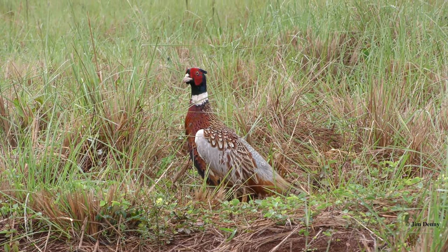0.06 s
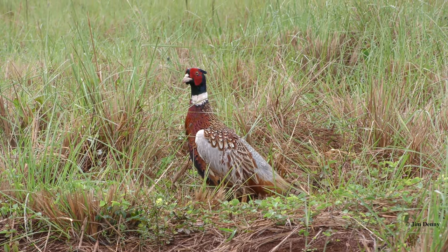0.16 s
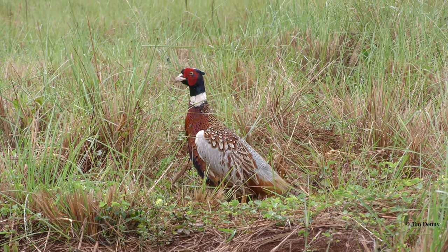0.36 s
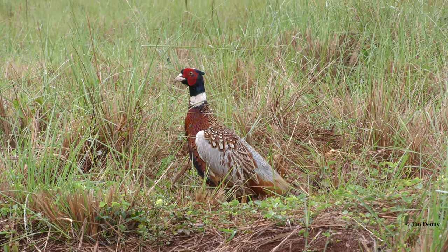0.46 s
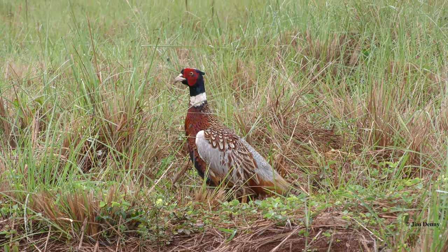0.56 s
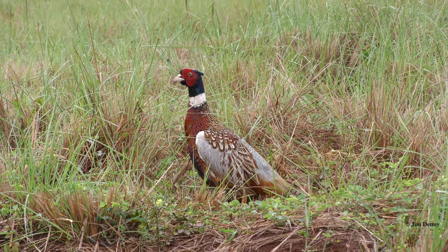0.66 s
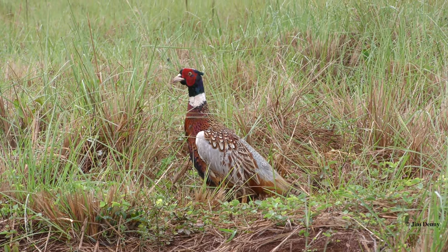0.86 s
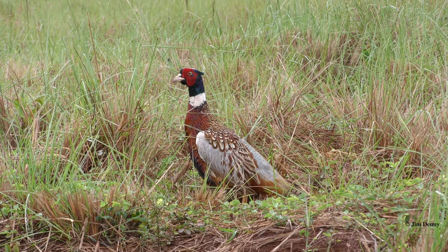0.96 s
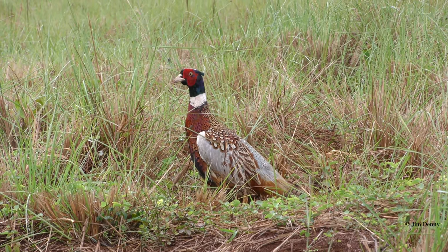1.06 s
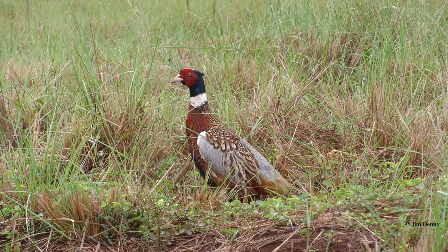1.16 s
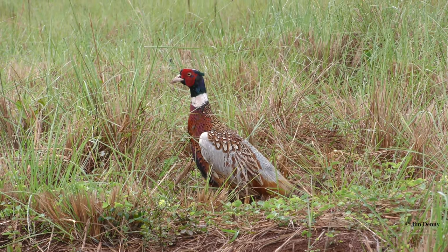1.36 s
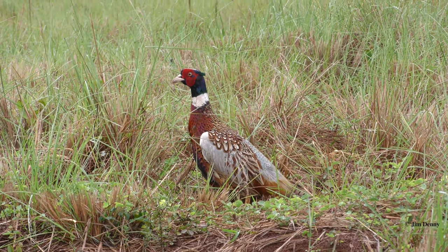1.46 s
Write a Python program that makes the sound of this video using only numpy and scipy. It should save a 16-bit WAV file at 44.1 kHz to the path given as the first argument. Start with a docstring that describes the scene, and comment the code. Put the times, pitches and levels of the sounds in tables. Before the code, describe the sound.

A pheasant crows harshly twice, then flaps its wings briefly in an open field.

```python
"""Over a low wash of air and a faint chirp, a cock pheasant crows twice in an open grass field.
A short whirr of wingbeats follows, while small birds whistle far off.
Each note of the crow is a shaky tone plus a harsh rattle, filtered by the resonances of the throat;
the grass scatters it and the field echoes it. Each wingbeat pushes a pulse of air and swishes."""
import sys
import numpy as np
from scipy import signal
from scipy.fft import rfft, irfft
from scipy.io import wavfile
from scipy.ndimage import uniform_filter1d

SR = 44100
rng = np.random.default_rng(int(sys.argv[2]) if len(sys.argv) > 2 else 0)


def dump_mix(stems):
    """Bounce the given channels to the path in sys.argv[1] as a 16-bit WAV at rate SR."""
    frames = np.atleast_2d(stems).T  # one column per channel
    limited = np.clip(frames, -1, 1)  # hard clip at full scale
    pcm = np.round(limited * 32767).astype(np.int16)
    wavfile.write(sys.argv[1], SR, pcm)


N = 66150
T = np.arange(N) / SR


def amp(db):
    """Amplitude ratio of a level in decibels."""
    return 10 ** (np.asarray(db) / 20)


def unit(x):
    """Normalisation to an rms of 1."""
    return x / np.sqrt(np.mean(abs(x) ** 2) + 1e-20)


def read(points, hz):
    """Interpolation of a table on a log-frequency axis."""
    f, value = np.transpose(points)
    return np.interp(np.log(hz + 1), np.log(f + 1), value)


def pulse(t, width_s):
    """Gaussian envelope centred on t = 0."""
    return np.exp(-.5 * (t / width_s) ** 2)


def wander(hz):
    """Low-pass noise: smooth random motion up to a given rate."""
    f = np.fft.rfftfreq(N, 1 / SR)
    return unit(irfft(rfft(rng.standard_normal(N)) / (1 + (f / hz) ** 4), N))


def colour(x, points, size=4096):
    """Minimum-phase filtering with the given spectrum."""
    log_gain = np.log(amp(read(points, abs(np.fft.fftfreq(size, 1 / SR)))))
    taps = np.fft.ifft(np.exp(np.conj(signal.hilbert(log_gain)))).real[:size // 2]
    return signal.fftconvolve(x, taps)[:N]


def scatter(x, levels, t60s, size=256):
    """Reverberation: many small reflections, different at each ear, decay exponentially in each band."""
    hz, t, bands = signal.stft(rng.standard_normal((2, SR)), SR, nperseg=size)
    fade = amp(-60 * t / read(t60s, hz)[:, None]) * (t > 0)
    fade *= amp(read(levels, hz))[:, None] / np.sqrt((fade ** 2).sum(1, keepdims=True) * size / 2)
    response = signal.istft(bands * fade, SR, nperseg=size)[1]
    return signal.fftconvolve(x[None], response, axes=1)[:, :N]


# Likeness of the two channels. Each row: frequency in Hz, left-right correlation.
COHERENCE = [(60, .99), (290, 0.95), (640, 0.8), (1410, 0.45), (3100, -0.16), (6800, 0.027), (15000, 0.063)]
def diffuse_noise(points, patch_db, size=1024):
    """A diffuse field: both ears agree at low frequencies, and the level drifts in random patches."""
    hz = np.fft.rfftfreq(size, 1 / SR)
    a, b, c, d, patch = rng.standard_normal((N // 256 + 5, len(hz), 5)).T
    patch = unit(uniform_filter1d(uniform_filter1d(patch, size=10, axis=0), size=10, axis=1))
    same = np.clip(read(COHERENCE, hz), -1, 1)[:, None]
    left = a + 1j * b
    right = same * left + np.sqrt(1 - same ** 2) * (c + 1j * d)
    bands = np.array([left, right]) * amp(read(points, hz)[:, None] + patch_db * patch)
    return unit(signal.istft(bands, nperseg=size, noverlap=size - size // 4)[1][:, :N])


# Spectrum of the air. Each row: frequency in Hz, relative level in dB.
AIR_SPECTRUM = [(20, -17), (60, -2), (250, 0), (600, 4.5), (950, 2.5), (1400, -5.5), (2200, -27),
                (4500, -19.5), (8000, -20), (15500, -27.5)]
def air():
    """Ambient noise: a low, steady wash from all directions."""
    return amp(-45.5) * diffuse_noise(AIR_SPECTRUM, patch_db=-1.5)


# Distant chirps. Each row: start and length in seconds, first and last pitch in Hz, level in dB.
CHIRPS = [(.165, 0.062, 5080, 4750, -52.5), (1.112, 0.055, 3330, 3150, -44), (1.18, 0.036, 3300, 2740, -47),
          (1.318, 0.068, 4430, 4010, -44.5), (1.398, 0.017, 4110, 3530, -44.5),
          (1.412, 0.062, 3480, 3576, -49)]
def small_birds():
    """Frequency glides: thin, wavering whistles, blurred by reverberation over the distance."""
    song = np.zeros(N)
    for start, length, first_hz, last_hz, db in CHIRPS:
        progress = np.clip((T - start) / length, 0, 1)
        hz = (first_hz + (last_hz - first_hz) * progress) * (1 + .012 * wander(hz=150))
        envelope = amp(db) * np.sqrt(abs(np.sin(np.pi * progress)))
        song += envelope * np.sin(2 * np.pi * np.cumsum(hz) / SR)
    return song * np.array([[1], [-.4]]) + scatter(song, levels=[(1, -4)], t60s=[(1, .18)])


# Wingbeats. Each row: time in seconds, thump level in dB, swish level in dB.
WINGBEATS = [(1.018, -36.5, -41.5), (1.091, -35, -53), (1.173, -34.5, -39.5), (1.25, -30, -41),
             (1.326, -31, -38), (1.395, -31, -41.5), (1.466, -31.5, -57)]
# Feather rustle, held at its end values. Each row: time in seconds, level in dB.
RUSTLE = [(.85, -49.5), (.97, -45), (1.15, -42), (1.35, -43.5), (1.5, -47.5)]
# Spectrum of swish and rustle. Each row: frequency in Hz, relative level in dB.
FEATHER_SPECTRUM = [(40, 0.5), (120, 4.5), (250, 2), (600, -5), (1200, -5), (2200, -12), (4000, -13),
                    (8000, -25.5), (15000, -35)]
def wings(thump_hz=97.5, swish_s=.0071, upstroke_s=.017):
    """Air displacement: each beat thumps and swishes twice; swishes and rustle add in power."""
    thumps = np.zeros(N)
    power = amp(np.interp(T, *np.transpose(RUSTLE))) ** 2
    for centre, thump_db, swish_db in WINGBEATS:
        t = T - centre
        thumps += amp(thump_db) * np.cos(2 * np.pi * thump_hz * t) * pulse(t, width_s=.0049)
        strokes = pulse(t, swish_s) + amp(-11) * pulse(t - upstroke_s, swish_s)
        power += (amp(swish_db) * strokes) ** 2
    return thumps + np.sqrt(power) * diffuse_noise(FEATHER_SPECTRUM, patch_db=2.0)


def squeak(centre_s=.8, hz=2740):
    """A tone burst: a few milliseconds of a high whistle and its octave, within the second note."""
    t = T - centre_s
    phase = 2 * np.pi * hz * t
    return amp(-38) * pulse(t, width_s=.0027) * (np.sin(phase) + np.sin(2 * phase))


def rattle(rate_hz=209.3, puff_cycles=.84, air_share=.68):
    """Pulsed excitation: each irregular cycle gives a slap and a decaying puff of air."""
    cycle = np.cumsum(rate_hz * (1 + .2 * wander(rate_hz))) / SR
    slaps = np.diff(np.floor(cycle), prepend=0) * amp(2 * rng.standard_normal(N))
    puffs = np.exp(-(cycle % 1) / puff_cycles) * rng.standard_normal(N)
    return np.sqrt(1 - air_share) * unit(slaps - slaps.mean()) + np.sqrt(air_share) * unit(puffs)


# Sidebands at -2, -1, +1 and +2 tone pitches from the ring. Each entry: level in dB relative to it.
SIDEBAND_DB = [-25, -25.5, -13, -33]
def shrill_ring(drive, tone_phase, age, open_hz=3990, sag_hz=135, opening_s=.055, width_hz=260):
    """Resonance and modulation: a ring climbs as the beak opens, and the tone gives it sidebands."""
    centre_hz = open_hz - sag_hz * np.exp(-age / opening_s)
    carrier = np.exp(2j * np.pi * np.cumsum(centre_hz) / SR)
    ring = unit(signal.sosfilt(signal.butter(2, width_hz / 2, fs=SR, output="sos"), drive / carrier))
    ring /= 1 + abs(ring)  # saturation evens out the level
    sidebands = sum(amp(db) * np.exp(1j * k * tone_phase) for k, db in zip((-2, -1, 1, 2), SIDEBAND_DB))
    return unit((carrier * (1 + sidebands) * ring).real)


# Resonances of the throat. Each row: frequency in Hz, relative gain in dB.
THROAT_RESPONSE = [(150, -26.5), (550, -21), (800, -6), (1150, -16), (1300, 4.5), (1500, -14), (1660, 2),
                   (1780, -5.5), (1950, 5), (2070, -7.5), (2210, -19.5), (2500, -15), (2950, -7.5),
                   (3400, -4.5), (3680, 4.5), (4100, -12.5), (4350, -17.5), (4680, -2.5), (4800, -7.5),
                   (5160, -5), (5450, -14.5), (6400, -19), (6800, -29.5), (11500, -30), (12500, -41),
                   (16000, -44)]
def throat(tone_phase, age, treble_hz=4500, brighten_s=.012):
    """Source and filter: the rattle excites the throat's resonances, making a hoarse rasp."""
    drive = rattle()
    rasp = amp(-5.5) * unit(colour(drive, THROAT_RESPONSE))
    rasp += amp(-2.7) * shrill_ring(drive, tone_phase, age)
    treble = signal.sosfiltfilt(signal.butter(6, treble_hz, "high", fs=SR, output="sos"), rasp)
    return rasp - treble * np.exp(-age / brighten_s)  # muffled until the beak is open


# The crow, one table per note. Each row: time in seconds, pitch in Hz, tone gain in dB, rasp gain in dB.
CROW_NOTES = [
    [(.217, 1016, -33, -25.5), (.231, 1027, -23.5, -22.5), (.28, 1072, -21, -19), (.35, 1069, -19, -19.5),
     (.43, 1053, -22.5, -22), (.45, 1060, -19, -25.5), (.459, 1166, -22.5, -28), (.467, 1088, -30, -42)],
    [(.729, 1057, -35, -31), (.738, 1000, -29, -22), (.752, 1018, -23.5, -22.5), (.774, 1059, -23, -21),
     (.815, 1057, -20.5, -21.5), (.842, 1064, -23.5, -24), (.86, 1131, -25, -33.5),
     (.882, 1113, -24.5, -33), (.894, 1163, -40, -34.5)],
]
def crow(jitter=.021, shimmer_db=2.0, ramp_s=.007):
    """Jitter and shimmer: each note is a tone shaking in pitch and level, joined by the throat's rasp."""
    voice = np.zeros(N)
    for rows in CROW_NOTES:
        times, hz, tone_db, rasp_db = np.transpose(rows)
        age = np.maximum(T - times[0], 0)
        gate = np.clip(np.minimum(age, times[-1] - T + ramp_s) / ramp_s, 0, 1)
        pitch_hz = np.interp(T, times, hz) * (1 + jitter * wander(hz=197))
        phase = 2 * np.pi * np.cumsum(pitch_hz) / SR
        tone = unit(np.sin(phase) * amp(shimmer_db * wander(hz=136)))
        voice += gate * amp(np.interp(T, times, tone_db)) * tone
        voice += gate * amp(np.interp(T, times, rasp_db)) * throat(phase, age)
    return voice + squeak()


# Reflections from the grass, the wider field and the far echo. Each row: frequency in Hz, gain in dB.
GRASS_GAIN = [(500, -17), (1100, -28), (2000, -11.5), (4000, -0.5), (6000, -7.5), (8000, 8), (14000, 0)]
FIELD_GAIN = [(500, -4.5), (1100, -13.5), (2000, -19), (3000, -5), (3800, -7), (4080, -11.5), (4350, 3),
              (4700, -6), (5300, -5), (10000, -1)]
ECHO_GAIN = [(1100, -20.5), (2000, -15.5), (3800, -21), (4100, -13), (4500, -18), (10000, -20)]
# Reverberation times. Each row: frequency in Hz, time to fall by 60 dB in seconds.
GRASS_DECAY = [(500, 0.41), (4000, 0.15), (10000, 0.35)]
FIELD_DECAY = [(500, 0.94), (1100, 0.71), (4000, 0.76), (10000, 0.5)]
def across_field(voice, right_lag_s=.00004, echo_s=.13):
    """Multipath propagation: the direct sound reaches the left ear first; scatter and an echo follow."""
    lag = np.exp(-2j * np.pi * np.fft.rfftfreq(N, 1 / SR) * right_lag_s)
    direct = np.array([voice, irfft(rfft(voice) * lag, N)])
    echo = scatter(np.interp(T - echo_s, T, voice), ECHO_GAIN, t60s=[(1, .078)])
    grass = scatter(voice, GRASS_GAIN, GRASS_DECAY)
    field = scatter(voice, FIELD_GAIN, FIELD_DECAY)
    return direct + grass + field + echo


def scene():
    """Superposition of the pheasant, the small birds and the wash of air."""
    return across_field(crow()) + wings() + small_birds() + air()


def record(dry, cutoff_hz=15750):
    """Band limiting: a linear-phase low-pass filter removes the highest treble."""
    taps = signal.firwin(511, cutoff_hz, window=("kaiser", 9), fs=SR)
    return signal.oaconvolve(dry, taps[None], "same")


dry = scene()
out = record(dry)
dump_mix(out)
```